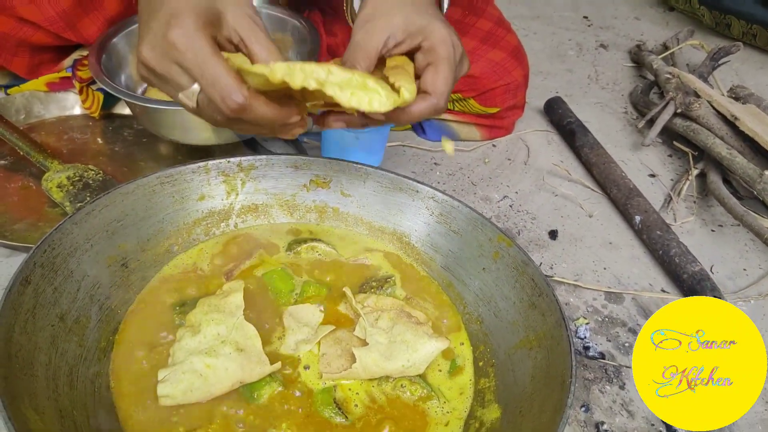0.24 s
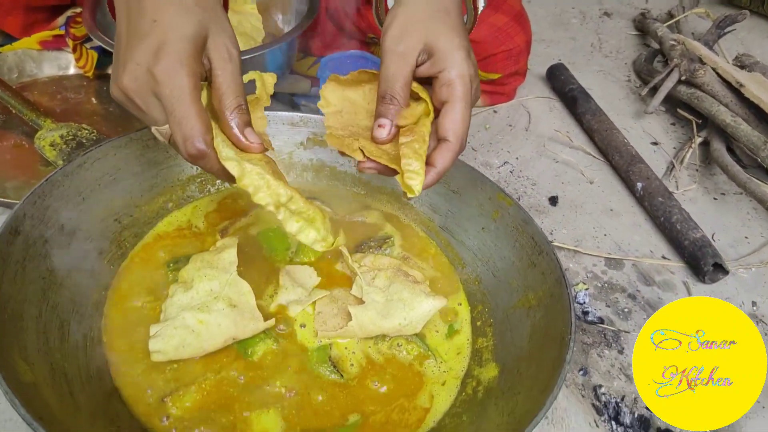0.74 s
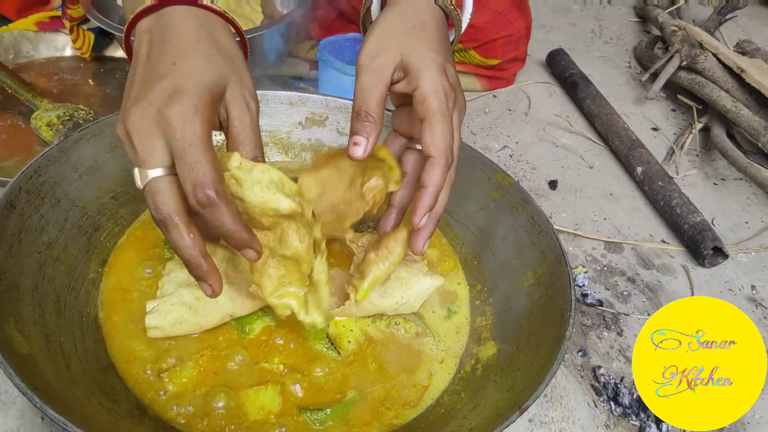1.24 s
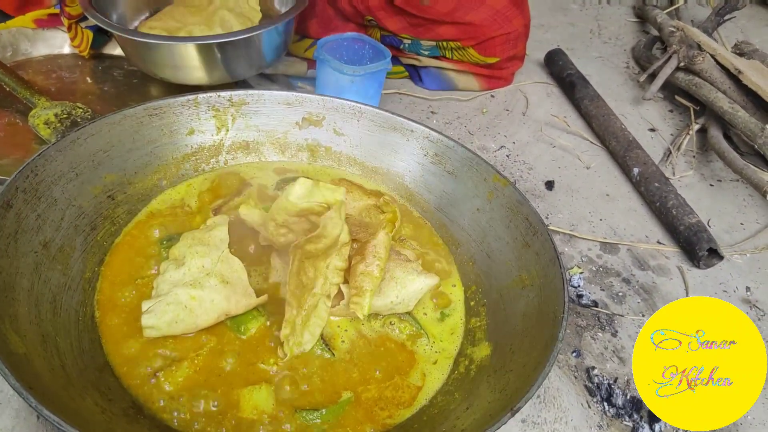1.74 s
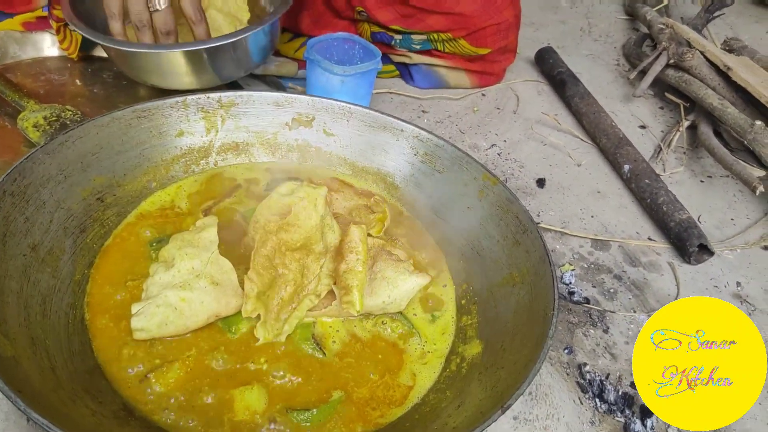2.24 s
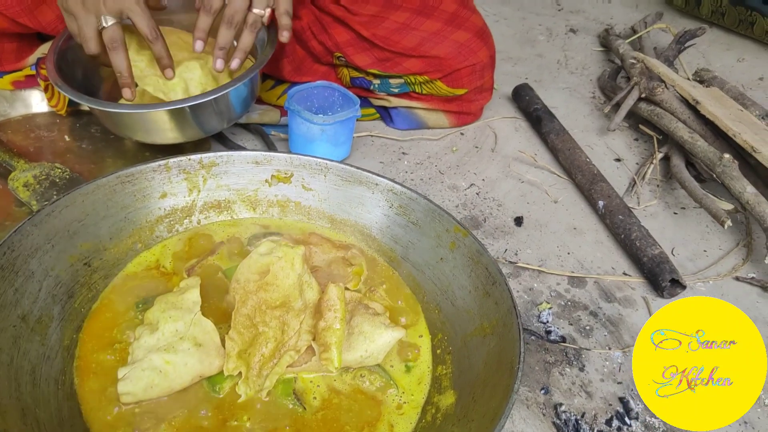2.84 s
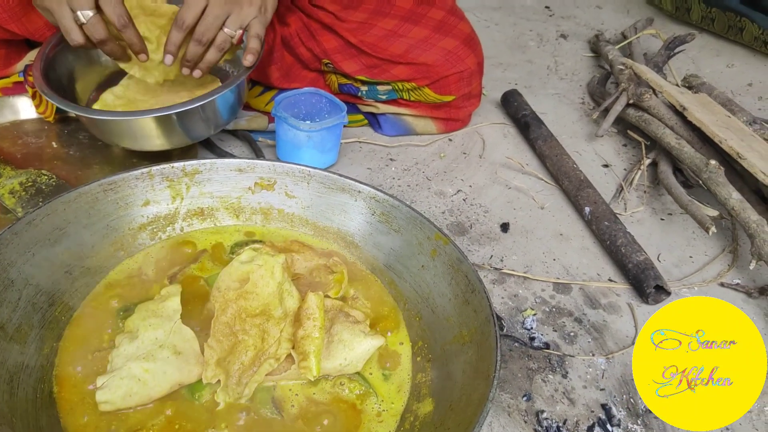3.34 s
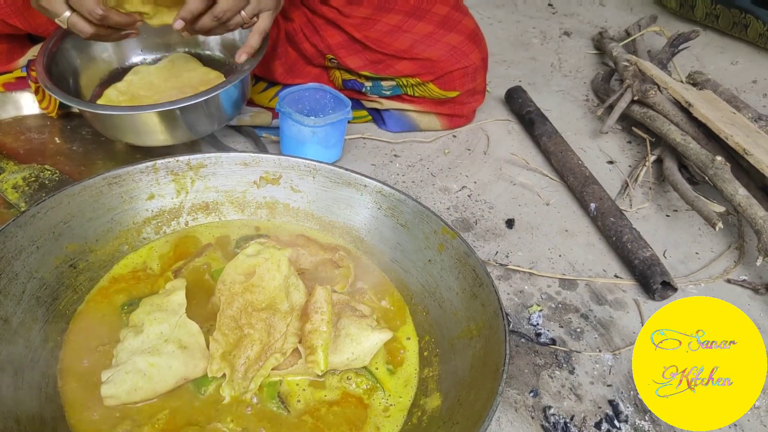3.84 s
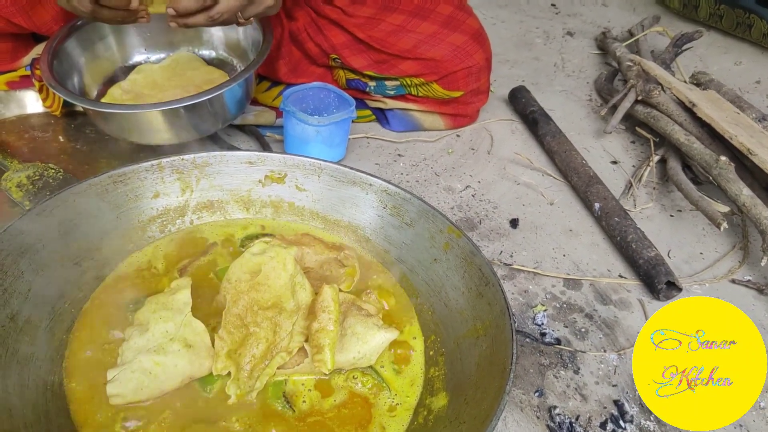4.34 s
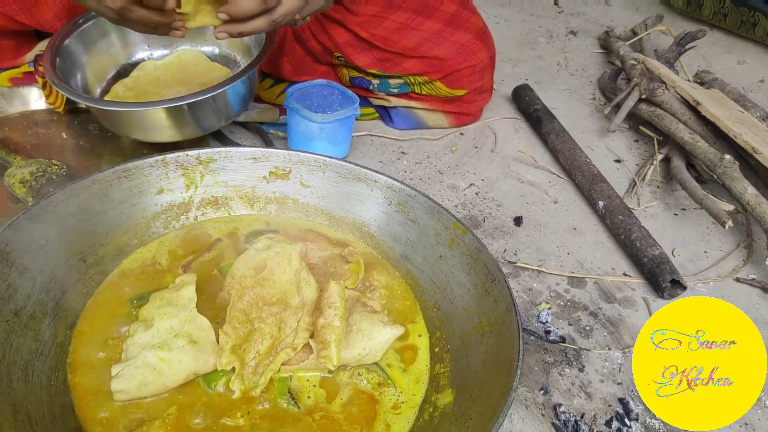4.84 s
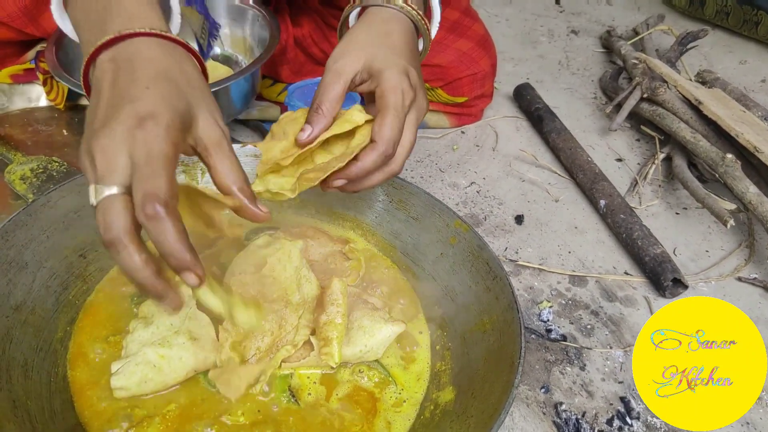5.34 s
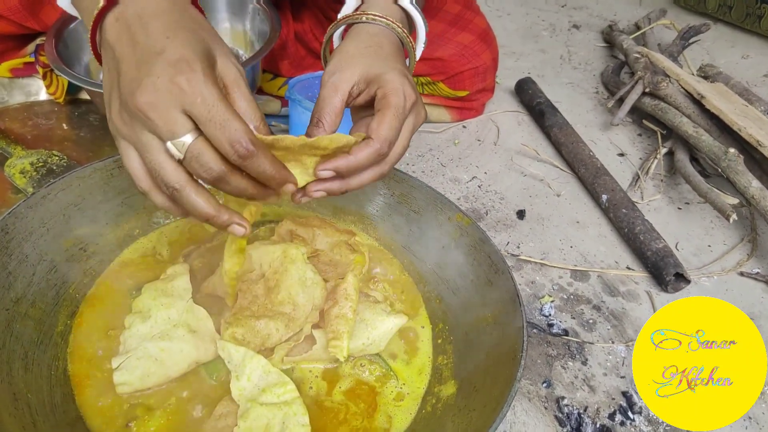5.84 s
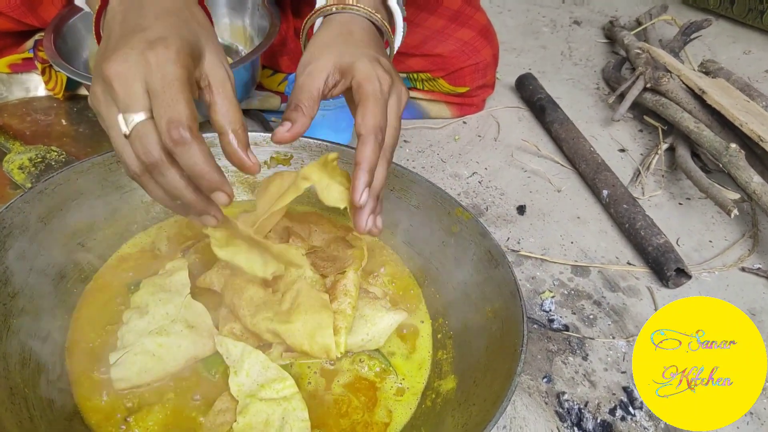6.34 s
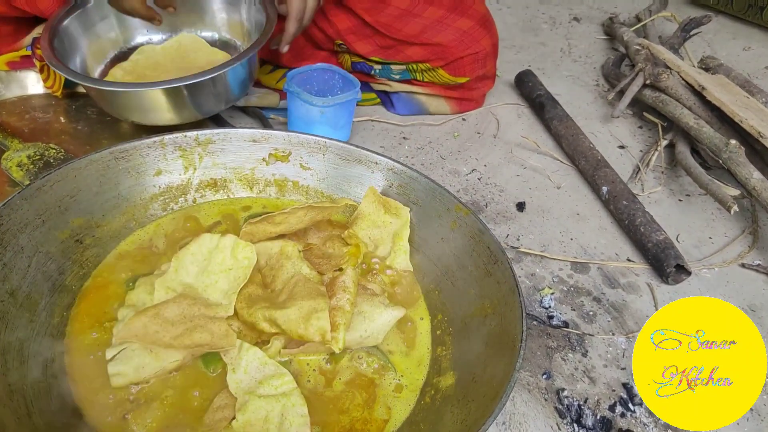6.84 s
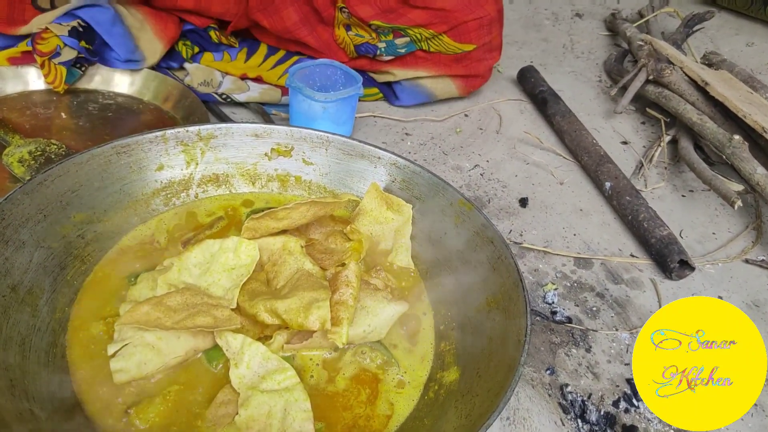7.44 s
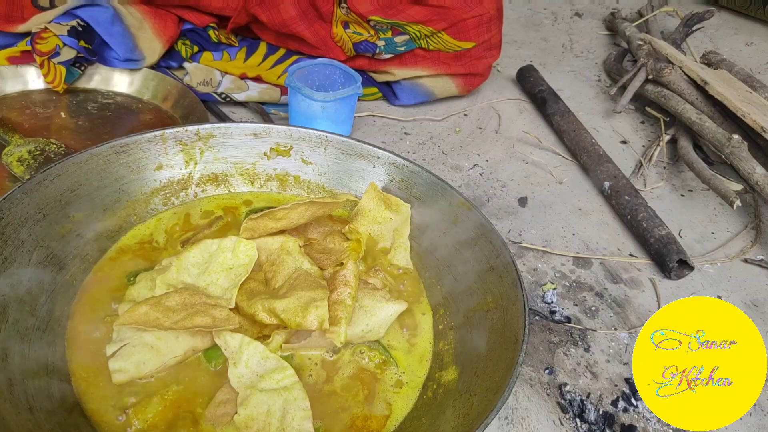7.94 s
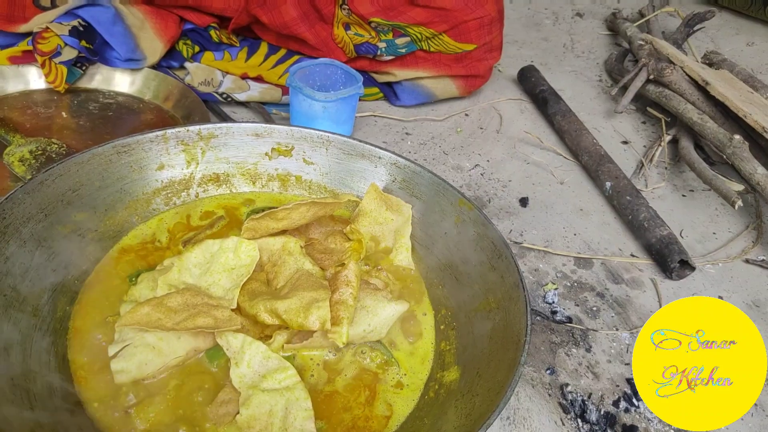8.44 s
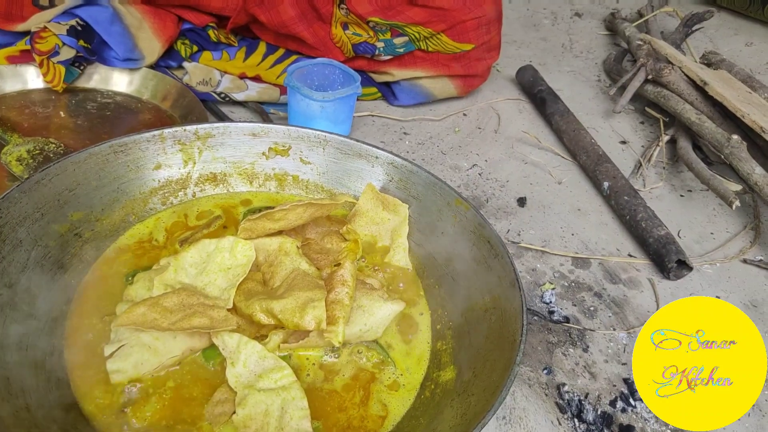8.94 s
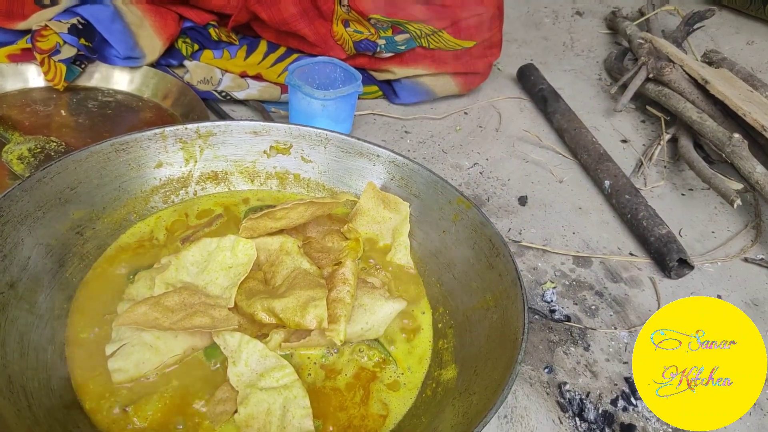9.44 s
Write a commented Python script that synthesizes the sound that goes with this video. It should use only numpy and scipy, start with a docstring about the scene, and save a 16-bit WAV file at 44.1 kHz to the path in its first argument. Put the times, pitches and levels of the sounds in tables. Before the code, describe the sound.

Brittle fried flatbread is broken by hand close to a small microphone, crackling in short bursts with crumbs rustling after each one. The sharpest snaps come early, then several more rounds. Toward the end come light ringing knocks on a steel bowl, a brief gritty scrape with more cracks, and a final bump. A pan of curry simmers gently throughout, with a low far-off outdoor rumble beneath.

```python
"""A pan of curry simmers and bubbles over a far outdoor rumble while crisp fried flatbreads are snapped by
hand and dropped in. The cracks come in clusters, trailing splinters and crumbs: the loudest at 1 s, more
from 3 to 6 s. From about 7 s the steel bowl that holds the bread rings as it is knocked; near 9 s bread
scrapes over the steel and cracks again, and a last bump ends the scene. Faint whistles, squeaks and a thin
high ring come and go, and a small microphone keeps little above 8 kHz."""
import sys
import numpy as np
from scipy import signal
from scipy.fft import rfft, irfft, next_fast_len
from scipy.io import wavfile
from scipy.ndimage import uniform_filter1d, minimum_filter1d, map_coordinates

SR = 44100
rng = np.random.default_rng(int(sys.argv[2]) if len(sys.argv) > 2 else 0)


def file_out(sig):
    """Save sig as 16-bit WAV at sys.argv[1]."""
    # one column per channel
    cols = np.atleast_2d(sig).T
    # limit, then scale
    lim = np.clip(cols, -1, 1)
    pcm = np.round(lim * 32767).astype(np.int16)
    wavfile.write(sys.argv[1], SR, pcm)


N = 426917

# Tone of the far rumble. Each row: frequency in Hz, relative level in dB.
RUMBLE_EQ = [(20, 8), (166, 4), (194, -9), (293, -11), (480, -19.5), (620, -25.5), (1060, -120)]
# The rumble swells. Each row: peak time in seconds, level in dB.
RUMBLE_SWELLS = [(0.65, -62), (2.08, -61)]
# Reverb of pan and walls. Each row: frequency in Hz, seconds to fall 60 dB.
YARD_DECAY = [(500, 0.09), (2000, 0.04), (7000, 0.044)]
# Faint short whistles, squeaks and a thin high ring.
# Each row: start and end in seconds, first and last pitch in Hz, level in dB.
SOFT_TONES = [(1.472, 1.603, 1380, 1390, -50), (7.023, 7.046, 2210, 2086, -37.5),
              (7.075, 7.13, 3510, 3480, -48.5), (7.89, 7.945, 3090, 3040, -51.5)]
# Fader moves of the simmer. Each row: time in seconds, then bubbling, rustle and fizz faders in dB.
SIMMER_FADERS = [(0, -59.5, -64.5, -56), (0.3, -48, -48.5, -49), (0.681, -61.5, -58.5, -57),
                 (1.101, -55, -50.5, -50), (1.43, -46.5, -55, -58.5), (1.8, -57, -60, -57),
                 (2.111, -53.5, -77.5, -66.5), (2.299, -51.5, -62, -52.5), (2.6, -51, -66.5, -61),
                 (3.15, -46, -64, -54.5), (3.5, -57.5, -52.5, -54.5), (3.82, -54, -62.5, -65.5),
                 (4.119, -65.5, -90.5, -56.5), (4.4, -53, -53.5, -53), (4.88, -55.5, -55, -57.5),
                 (5.3, -46, -52.5, -49), (5.75, -54.5, -58.5, -60), (6.05, -51, -53.5, -55),
                 (6.379, -51.5, -57.5, -62), (6.85, -50.5, -53.5, -58.5), (7.277, -55, -59, -70),
                 (7.58, -59.5, -57, -62), (8.15, -46.5, -57, -56), (8.62, -44.5, -58.5, -55.5),
                 (9.33, -49.5, -64.5, -67), (9.68, -53, -58, -54)]
# Bread shifts. Each row: start in seconds, dull and bright levels in dB, seconds to fall 60 dB.
BREAD_SHIFTS = [(0.121, -38, -35, 0.33), (0.519, -66, -49.5, 0.45), (1.615, -51, -46.5, 0.35),
                (2.66, -44, -51, 1), (2.77, -41.5, -46.5, 0.64), (3.05, -49.5, -54, 0.37),
                (3.176, -43, -45.5, 0.92), (3.384, -41, -43.5, 0.39), (3.883, -52, -54, 0.6),
                (4.199, -47.5, -80, 0.92), (4.246, -42.5, -42.5, 0.48), (4.91, -46, -71, 0.28),
                (5.018, -42.5, -46.5, 0.43), (5.474, -49, -45.5, 0.78), (5.82, -51, -44, 0.15),
                (6.169, -53.5, -50.5, 0.89), (6.426, -53.5, -43.5, 0.45), (7.001, -53, -47.5, 1),
                (7.303, -35, -43.5, 0.52), (7.658, -43, -52, 1), (7.965, -38.5, -42, 0.31),
                (8.169, -51.5, -76, 0.97), (8.43, -42, -53, 0.28), (8.73, -43.5, -46.5, 1),
                (8.94, -40.5, -43, 1), (9.458, -37, -46.5, 0.6), (9.551, -50, -43.5, 0.27)]
# Short pitched pops from cracking bread, knocks and bubbles.
# Each row: start in seconds, peak level in dB, pitch in Hz.
PITCHED_POPS = [(8.291, -49, 264), (9.007, -35, 420), (9.464, -33, 436), (0.135, -15.5, 1480),
                (0.25, -28, 1230), (0.43, -24.5, 1016), (0.834, -6.5, 1420), (0.985, -9, 1570),
                (2.659, -10.5, 677), (2.761, -16.5, 688), (2.82, -35, 770), (2.029, -32, 1310),
                (2.515, -37.5, 1040), (3.18, -31.5, 1090), (3.38, -23.5, 730), (3.391, -19.5, 693),
                (8.232, -37, 724), (3.629, -37.5, 990), (3.878, -31, 1110), (2.765, -39, 220),
                (4.933, -29.5, 1180), (5.065, -34, 1330), (5.21, -32.5, 1000), (6.076, -30.5, 776),
                 (7.306, -25.5, 674), (7.308, -17, 1960), (7.351, -30, 640), (7.43, -33.5, 1020),
                (9.439, -33.5, 1000), (7.695, -37, 704), (7.739, -29, 700), (7.968, -17, 1320),
                (8.538, -27, 1300), (8.728, -22.5, 766), (8.772, -21.5, 744), (8.455, -39, 710),
                (8.083, -45, 730)]
# The bowl's hollow low modes. Each row: pitch in Hz, level in dB, seconds to fall 60 dB.
THUD_MODES = [(357.4, -12, 0.32), (646, -8.5, 0.11)]
# Bread or a hand bumps the bowl. Each row: start in seconds, level in dB.
BOWL_THUDS = [(2.661, -21.5), (7.306, -34.5), (8.77, -38.5), (9.462, -34.5)]
# The bowl's steely modes. Each row: pitch in Hz, level in dB, seconds to fall 60 dB.
RING_MODES = [(1179, -7, 0.55), (1281, -2, 0.6), (1367, 0, 0.45), (1793, -7, 0.36), (1863, -5, 0.45),
              (1949, -6, 0.42), (950, -12, 0.25), (2225, -7, 0.2), (2374, -5, 0.15), (3246, -10, 0.3),
              (3570, -10, 0.25)]
# Knocks that ring the bowl. Each row: start in seconds, level in dB, hardness as tilt in dB per octave.
BOWL_KNOCKS = [(6.79, -56, -11), (7.306, -49, 7), (7.35, -45, 9.5), (7.608, -54, -7), (7.695, -59, -20),
               (7.7373, -49, -15), (7.967, -49, -5), (8.775, -42.5, -4), (9.4621, -37, -1)]
# Bread dragged over steel. Each row: start and start of the fade-out in seconds, level in dB.
BREAD_SCRAPES = [(8.725, 8.774, -32), (8.801, 8.817, -33.5), (8.947, 9.048, -39.5)]
# Tone of a scrape. Each row: frequency in Hz, relative level in dB.
SCRAPE_EQ = [(1200, -14), (2200, 5), (3100, 3), (4200, -6.5), (7500, -3.5)]
# Top end of the driest cracks. Each row: time in seconds, level in dB ahead of the microphone's roll-off.
CRACK_SPARKLES = [(0.824, 3.5), (0.833, 6.5), (0.987, 13), (1.0295, 10.5), (3.378, 7), (3.3915, 13)]
# Tone of a crack's crisp edge. Each row: frequency in Hz, relative level in dB.
CRISP_EQ = [(2500, -30.5), (3200, -9.5), (4200, -6.5), (5300, -11), (6500, -1), (7500, -7), (16000, -4.5)]
# Tone of a crack's body. Each row: frequency in Hz, relative level in dB.
BODY_EQ = [(250, -42), (500, -41.5), (900, -14.5), (1400, -11), (2000, -6), (3000, -8), (3800, -20)]
# The bread cracks. Each row: time in seconds, crisp level in dB, body level in dB.
BREAD_CRACKS = [ (0.0631, -13.5, -23), (0.0673, -14.5, -20.5), (0.115, -11.5, -22.5), (0.133, -6.5, -24),
                (0.137, -8, -19.5),  (0.1486, -8.5, -22), (0.1778, -13, -24), (0.1958, -4, -21.5),
                (0.2518, -12.5, -31),  (0.259, -21, -29), (0.207, -41, -35.5), (0.225, -27, -38),
                (0.2677, -18.5, -31), (0.1759, -15, -29.5), (0.382, -19.5, -35), (0.3931, -21, -33),
                (0.4315, -11.5, -22), (0.799, -17, -35.5),  (0.816, -30.5, -45), (0.8233, -9, -27),
                (0.83, -17, -20.5), (0.835, -1.5, -15.5), (0.853, -14.5, -25.5),  (0.902, -27, -28.5),
                (0.9304, -28, -32), (0.947, -12, -27.5), (0.954, -5, -26), (0.961, -22, -25),
                (0.9859, 2.5, -7.5), (1.0003, -7.5, -44), (1.008, -47, -23), (1.031, -8, -19),
                (1.313, -35, -29.5), (1.371, -33.5, -31), (1.4234, -29.5, -33.5), (1.433, -26.5, -41),
                (1.629, -35, -36),   (2.6603, -36, -31.5), (2.7608, -26.5, -31.5), (3.18, -32, -51),
                (3.104, -50, -41), (3.2825, -23, -53), (3.32, -42, -37.5), (3.371, -16, -30),
                (3.38, -11, -19), (3.392, -4, -20.5), (4.473, -26, -42), (4.564, -29, -43),
                (4.6386, -16, -23), (4.245, -11, -27),  (4.2601, -8.5, -32), (4.276, -31, -29.5),
                (4.453, -14, -51), (4.5267, -22, -35), (4.5365, -15.5, -32.5), (4.574, -16.5, -25),
                (4.5808, -11.5, -26.5), (4.628, -11, -18.5), (4.6331, -5, -45), (4.685, -16, -20.5),
                (4.737, -27.5, -47), (4.798, -29, -37.5), (5.02, -23.5, -38), (5.0385, -19, -46),
                (5.0699, -15, -29), (5.482, -22.5, -40), (5.849, -32, -39), (6.0017, -22.5, -29.5),
                (6.073, -15, -27), (6.076, -6, -20.5), (6.081, -20, -21), (6.093, -6.5, -32),
                (6.098, -17, -18), (6.174, -20.5, -28.5), (6.218, -24.5, -27), (6.775, -34.5, -49),
                (6.884, -72, -37.5), (6.4566, -41, -31.5), (6.53, -13, -38.5),  (6.595, -30.5, -37),
                (6.662, -30, -43), (6.693, -35, -35.5), (6.7887, -39, -35.5), (7.3045, -65, -36),
                 (7.354, -35, -28), (7.969, -23.5, -27.5),  (8.082, -53, -30), (8.6535, -25, -32),
                (8.7289, -23.5, -22), (8.774, -14, -17.5), (8.8113, -18.5, -23), (8.937, -31, -25.5),
                (9.0042, -23, -22.5), (9.027, -32, -21), (9.069, -18, -27)]

CRUMB_DB, CRUMB_SLOPE, CRUMB_T60_S = -42, 0.43, 0.2  # crumbs after a 0 dB crack; dB per dB of crack
SPLINTER_WAIT_S, SPLINTER_DB, SPLINTER_SCATTER_DB = 0.006, -12, 12  # levels relative to the crack
MIC_HZ, MIC_FLOOR_DB, TOP_HZ = 7640, -62, 15500


def amp(db):
    """Decibels to gain."""
    return 10 ** (np.asarray(db) / 20)


def unit(x):
    """Scales to rms 1."""
    return x / np.sqrt(np.mean(x ** 2) + 1e-20)


def along(points, hz):
    """Reads a curve of (Hz, value) points on a log frequency axis."""
    freqs, values = np.transpose(points)
    return np.interp(np.log(hz + 1), np.log(freqs + 1), values)


def filtered(x, response):
    """Zero-phase EQ; response gives the gain at each frequency."""
    size = next_fast_len(N + 8192)
    return irfft(rfft(x, size) * response(np.fft.rfftfreq(size, 1 / SR)), size)[:N]


def noise(eq):
    """Noise of rms 1 coloured by (Hz, dB) points, silent beyond the outer ones."""
    low_hz, high_hz = eq[0][0], eq[-1][0]
    white = rng.standard_normal(N)
    return unit(filtered(white, lambda hz: amp(along(eq, hz)) * (hz > low_hz) * (hz < high_hz)))


def wobble(rate_hz):
    """A smooth random modulator."""
    knots = rng.standard_normal(int(N * rate_hz / SR) + 4)
    return map_coordinates(knots, [np.arange(N) * rate_hz / SR])


def place(times, shapes):
    """Mixes one row of samples in at each time."""
    at = np.round(times * SR).astype(int)[:, None] + np.arange(shapes.shape[1])
    return np.bincount(at.ravel(), shapes.ravel(), N + SR)[:N]


def envelopes(times, db, shape):
    """Triggers a shape at each time, peaking at its level; overlaps add in power."""
    return np.sqrt(place(times, (amp(db)[:, None] * shape / shape.max(axis=-1, keepdims=True)) ** 2))


def swells(times, db, rise_s, t60):
    """Gain that rises at each time and dies away."""
    t = np.arange(SR // 2) / SR
    return envelopes(times, db, (1 - np.exp(-t / rise_s)) * amp(-60 * t / t60))


def blips(times, db, hz, cycles, samples, rise_cycles=1.4):
    """Soft-edged sines that fall 60 dB in the given cycles."""
    turns = np.arange(samples) / SR * hz[:, None]
    attack = (1 - np.exp(-turns / rise_cycles)) ** 2
    shape = attack * amp(-60 * turns / cycles) * np.sin(2 * np.pi * turns)
    return place(times, amp(db)[:, None] * shape / np.abs(shape).max())


def grains(count, centre_hz, spread, cycles, scatter_db, samples):
    """A cloud of tiny blips with log-normal pitch, a few louder than the rest."""
    when, rarity = rng.random((count, 2)).T
    hz = np.clip(centre_hz * np.exp(spread * rng.standard_normal(count)), 560, 9000)
    db = -scatter_db * np.log(np.maximum(rarity, .03))
    return unit(blips(when * N / SR, db, hz, cycles, samples))


def patchy(x, depth_db):
    """Random patches a few hundred hertz wide swell and sink for a tenth of a second."""
    spectra = signal.stft(x, nperseg=512)[2]
    patches = uniform_filter1d(rng.standard_normal(spectra.shape), size=3, axis=0)
    patches = uniform_filter1d(patches, size=18, axis=1)
    return unit(signal.istft(spectra * amp(depth_db * unit(patches)), nperseg=512)[1][:N])


def even(x):
    """Irons out the level swings that noise has over a few milliseconds."""
    return x / np.sqrt(np.abs(uniform_filter1d(x ** 2, size=110)) + 0.16)


def rumble(bed_db=-69, swell_s=0.11):
    """Far outdoor rumble that wavers and now and then swells."""
    t = np.arange(N) / SR
    surges = sum(amp(db) * np.exp(-((t - peak) / swell_s) ** 2) for peak, db in RUMBLE_SWELLS)
    return np.hypot(amp(bed_db + 1.6 * wobble(2.9)), surges) * noise(RUMBLE_EQ)


def yard_reverb(x):
    """Pan and walls answer; each frequency dies at its own speed."""
    hz, t, spectra = signal.stft(rng.standard_normal(SR // 3), SR, nperseg=256)
    tail = signal.istft(spectra * amp(-60 * t / along(YARD_DECAY, hz)[:, None]), SR, nperseg=256)[1]
    predelayed = np.pad(x, (150, 0))
    return signal.fftconvolve(predelayed, tail / np.linalg.norm(tail))[:N]


def soft_tones():
    """Short gliding tones with soft ends and a slight flutter."""
    t, tones = np.arange(N) / SR, np.zeros(N)
    for start, end, first_hz, last_hz, db in SOFT_TONES:
        phase = 2 * np.pi * np.cumsum(np.interp(t, [start, end], [first_hz, last_hz])) / SR
        gate = np.clip(np.minimum(t - start, end - t) / 0.0044, 0, 1)
        tones += amp(db + 0.47 * wobble(61.4)) * gate * np.sin(phase)
    return tones


def crumb_ticks(count):
    """Gain that jumps for a few milliseconds whenever a crumb clicks."""
    t = np.arange(SR // 50) / SR
    when, rarity = rng.random((count, 2)).T
    jump = 1.6 * amp(-4 * np.log(np.maximum(rarity, .04)))
    shape = (1 - np.exp(-t / 0.0022)) * amp(-60 * t / 0.027)
    return 1 + place(when * N / SR, jump[:, None] * shape)


def crumb_showers():
    """Gain for the crumbs that each crack sheds, more after a louder one."""
    times, crisp_db, _ = np.transpose(BREAD_CRACKS)
    return swells(times, CRUMB_DB + CRUMB_SLOPE * crisp_db, rise_s=0.001, t60=CRUMB_T60_S)


def simmer():
    """Small bubbles, rustling crumbs and fizz: grain clouds on patchy hiss that swell as bread shifts."""
    times, *faders = np.transpose(SIMMER_FADERS)
    bubble_db, rustle_db, fizz_db = [np.interp(np.arange(N) / SR, times, db) for db in faders]
    starts, dull_db, bright_db, t60 = np.transpose(BREAD_SHIFTS)
    dull, bright = [swells(starts, db, rise_s=0.0014, t60=t60[:, None]) for db in (dull_db, bright_db)]
    bright = np.hypot(bright, crumb_showers())
    crackle = crumb_ticks(count=300) * amp(1.65 * wobble(7))  # ebbs and returns in all bands at once
    bubbles = grains(count=850, centre_hz=1120, spread=.38, cycles=11, scatter_db=3.5, samples=800)
    slosh = noise([(430, -20), (690, 15), (920, 6), (1250, 13), (1800, -0.5)])
    rustle = grains(count=3500, centre_hz=2600, spread=.33, cycles=7, scatter_db=4.5, samples=250)
    rustle += 0.87 * noise([(1600, -2.2), (2400, 0.92), (4300, 1)])
    fizz = grains(count=5000, centre_hz=6300, spread=.16, cycles=14, scatter_db=4.5, samples=150)
    fizz += 0.74 * noise([(4000, -7.5), (5200, -6), (6500, 2), (8300, -18)])
    thump = amp(-20.5) * dull * noise([(230, -4.5), (480, 7.5)])  # the low body of each shift
    return (thump
            + np.hypot(amp(bubble_db - 3.5), .5 * dull) * crackle ** 0.24 * bubbles
            + np.hypot(amp(bubble_db - 7.5), dull) * crackle ** 0.53 * patchy(slosh, depth_db=6)
            + np.hypot(amp(rustle_db), amp(-1) * bright) * crackle * patchy(rustle, depth_db=5)
            + np.hypot(amp(fizz_db), bright) * crackle * patchy(fizz, depth_db=4.5))


def pitched_pops():
    """Cracking bread, knocks and bubbles each ring for a few cycles at their own pitch."""
    times, db, hz = np.transpose(PITCHED_POPS)
    return blips(times, db, hz, cycles=14, samples=1500, rise_cycles=0.6)


def struck_bowl(hits, modes):
    """Every blow rings all modes at new strengths; a harder blow, where given, favours the high ones."""
    t = np.arange(SR // 2) / SR
    rings = np.zeros((len(hits), len(t)))
    for ring, (_, hit_db, *hardness) in zip(rings, hits):
        for hz, mode_db, t60 in modes:
            db = hit_db + mode_db + sum(hardness) * np.log2(hz / 1500) + rng.normal(0, 3.2)
            ring += amp(db - 60 * t / t60) * np.sin(2 * np.pi * hz * t)
    return place(np.transpose(hits)[0], rings)


def scrapes():
    """Bread rubs over steel: dense grit with a quick attack and a softer release."""
    t = np.arange(N) / SR
    gain = sum(amp(db) * np.clip(np.minimum((t - start) / 0.0048, (fade - t) / 0.023 + 1), 0, 1)
               for start, fade, db in BREAD_SCRAPES)
    grit = amp(4.3 * wobble(160))
    return gain * grit * noise(SCRAPE_EQ)


def sparkle():
    """A few milliseconds of high hiss on the driest cracks."""
    times, db = np.transpose(CRACK_SPARKLES)
    return swells(times - .001, db, rise_s=.0012, t60=.016) * noise([(8400, 0), (15800, -3)])


def cracks():
    """Bread snaps in a puff of noise a few milliseconds long; four weaker splinters rattle behind it."""
    times, crisp_db, body_db = np.transpose(BREAD_CRACKS)
    wait, drop = rng.exponential(1, (len(times), 4, 2)).T
    splinter_times = times + 0.0039 + SPLINTER_WAIT_S * np.minimum(wait, 4)
    splinter_db = SPLINTER_DB - SPLINTER_SCATTER_DB * drop
    starts = np.append(times, splinter_times) - .0022  # the attack comes before the peak
    t = np.arange(SR // 20) / SR
    attack = 1 - np.exp(-(t / 0.002) ** 2)
    rattle = amp(-29.5 - 60 * t / 0.022)
    puffs = np.zeros(N)
    for eq, db, t60 in (CRISP_EQ, crisp_db, 0.0044), (BODY_EQ, body_db, 0.011):
        shape = attack * (amp(-60 * t / t60) + rattle)
        puffs += even(noise(eq)) * envelopes(starts, np.append(db, db + splinter_db), shape)
    return puffs


def scene():
    """Bread, bowl and pops up close with a touch of yard, over the simmer and the rumble."""
    ring = amp(0.89 * wobble(45)) * struck_bowl(BOWL_KNOCKS, RING_MODES)  # bread inside makes it waver
    thuds = amp(2 * wobble(90)) * (pitched_pops() + struck_bowl(BOWL_THUDS, THUD_MODES))  # they rattle
    close = cracks() + scrapes() + ring + thuds
    cooking = close + amp(-11.5) * yard_reverb(close) + simmer()
    cooking = filtered(cooking, lambda hz: 1 / (1 + (170 / (hz + 1)) ** 6))  # small things radiate no bass
    return (cooking + sparkle() + soft_tones() + rumble())[None]


def record(dry):
    """A small microphone rolls off steeply near 8 kHz; a fast limiter holds the loudest cracks."""
    narrow = filtered(dry[0], lambda hz: amp(np.clip(-.05 * (hz - MIC_HZ), MIC_FLOOR_DB, 0)))
    safe_gain = np.minimum(1, .97 / (np.abs(narrow) + 1e-9))
    limited = narrow * uniform_filter1d(minimum_filter1d(safe_gain, size=130), size=90)
    return filtered(limited, lambda hz: hz < TOP_HZ)[None]


dry = scene()
out = record(dry)
file_out(out)
```